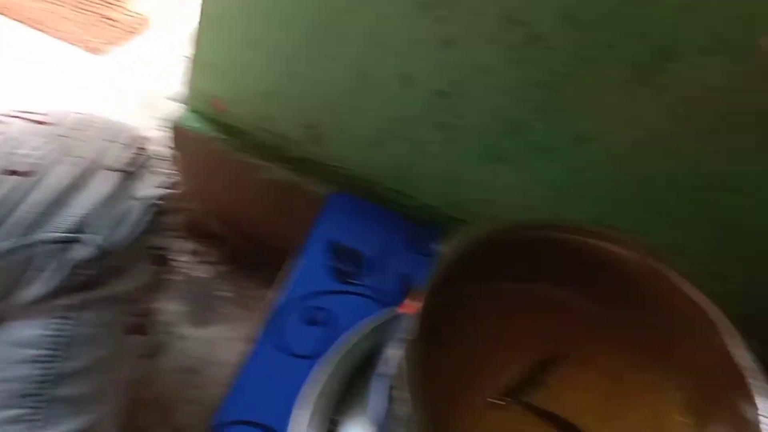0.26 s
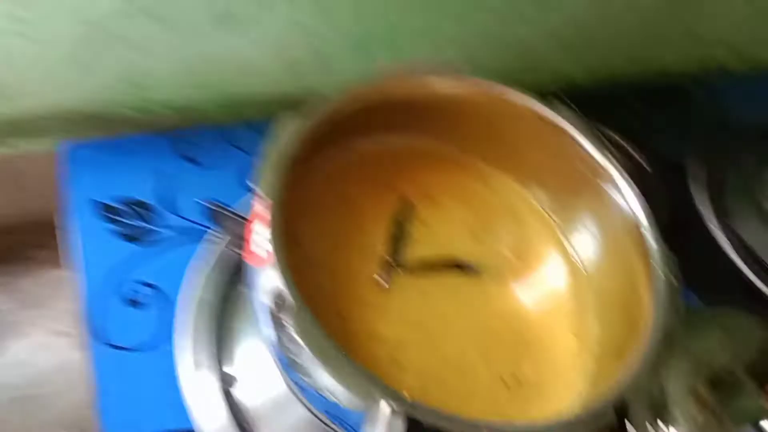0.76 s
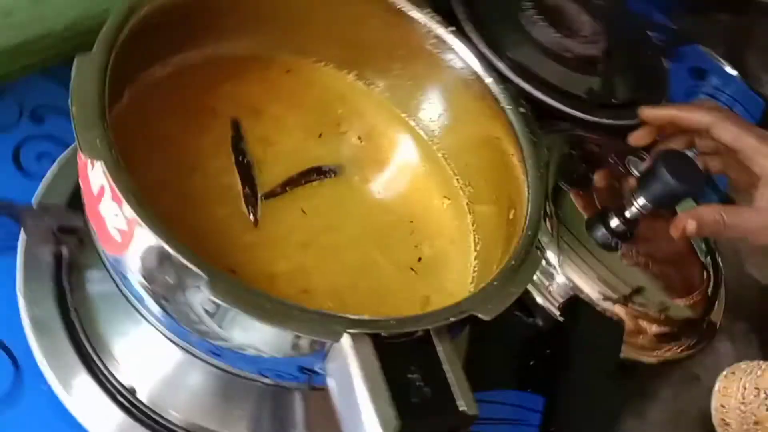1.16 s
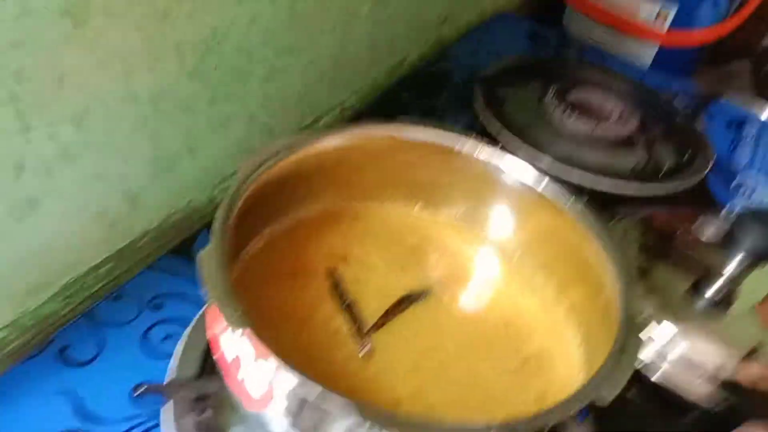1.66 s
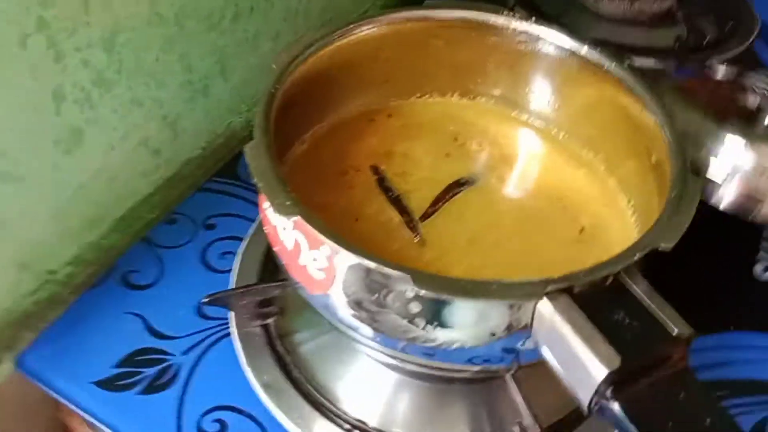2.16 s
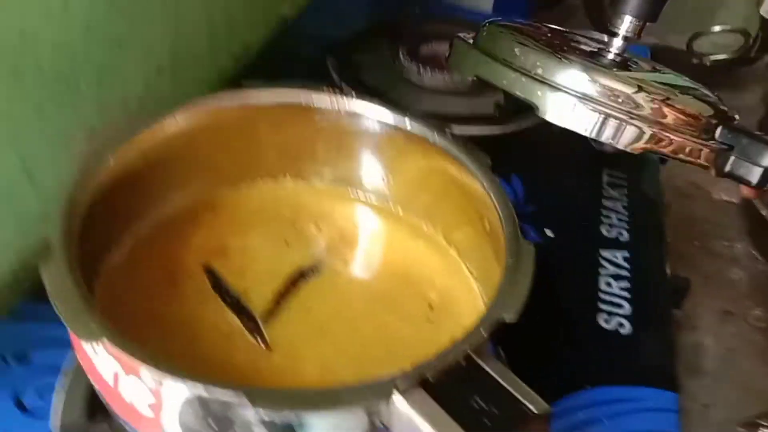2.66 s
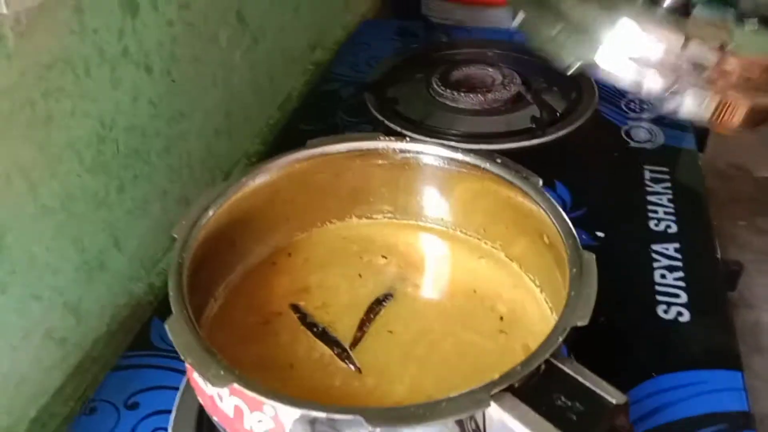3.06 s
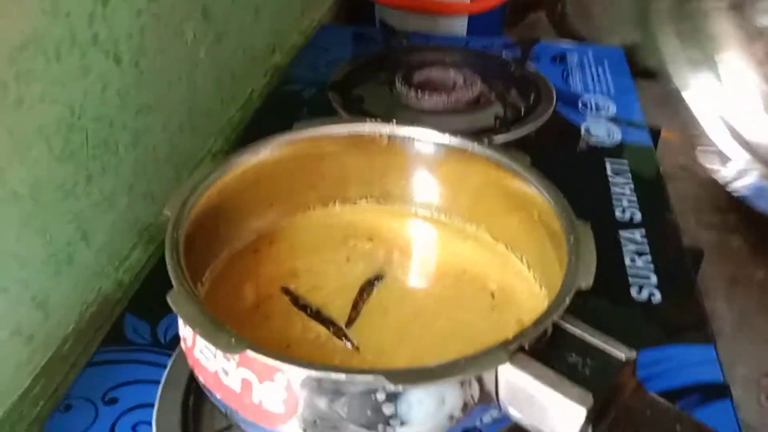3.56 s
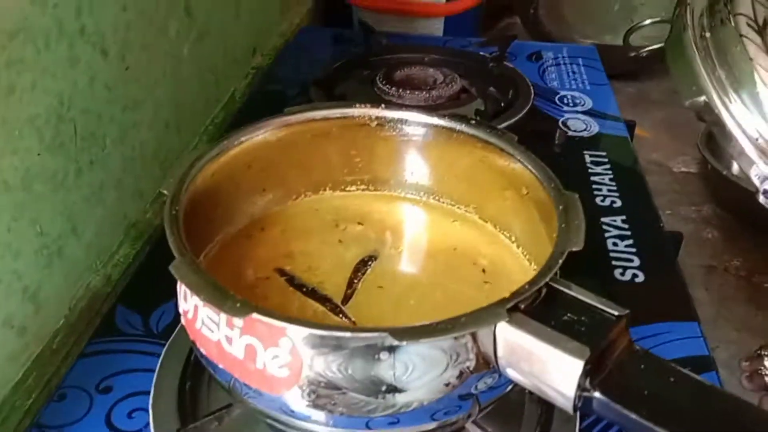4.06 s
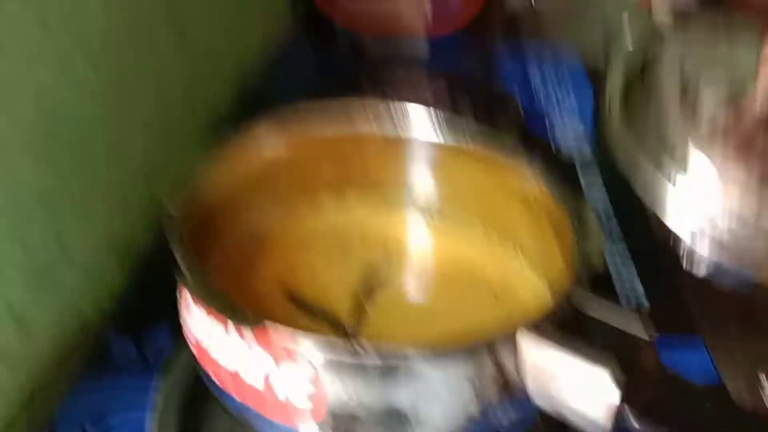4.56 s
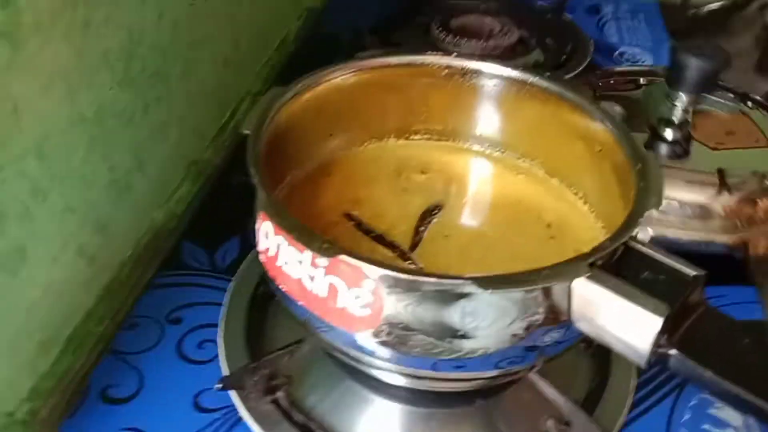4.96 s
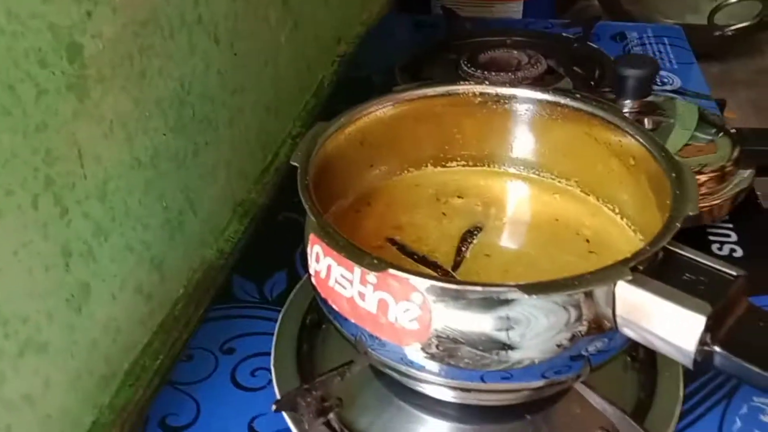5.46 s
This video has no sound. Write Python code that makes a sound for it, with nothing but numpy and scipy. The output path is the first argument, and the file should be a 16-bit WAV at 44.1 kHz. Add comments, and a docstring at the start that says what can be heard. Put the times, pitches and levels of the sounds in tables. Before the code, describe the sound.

After a brief vehicle horn outside, a metal pot lid clatters on a stove, rattles in the hand and lands with a clank.

```python
"""Moving a pressure-cooker lid

A steel lid is picked up in a small kitchen, close to a hand-held phone. It knocks on the stove top,
clinks and rattles in the air, then lands on the spare burner with a scrape and a last sharp clank.
Every hit or rub makes the steel ring at its own natural tones. A motor horn sounds once outside.
The phone overloads on the hardest blows and mutes the faintest sounds."""
import sys
import numpy as np
from scipy import signal
from scipy.fft import rfft, irfft
from scipy.io import wavfile
from scipy.ndimage import uniform_filter1d

SR = 44100
rng = np.random.default_rng(int(sys.argv[2]) if len(sys.argv) > 2 else 0)


def transcribe(signal):
    """Save signal, clipped to [-1, 1], as a 16-bit WAV file at the path in sys.argv[1]."""
    frames = np.atleast_2d(signal).T
    limited = np.clip(frames, -1, 1)
    pcm = np.round(limited * 32767).astype(np.int16)
    wavfile.write(sys.argv[1], SR, pcm)


N = 251370
T = np.arange(N) / SR
RING_T = T[:SR * 3 // 5]  # the 0.6 s that one hit is given to ring


def gain(db):
    """Turn decibels into a number to multiply by."""
    return 10 ** (np.asarray(db) / 20)


def unit(x, size=None):
    """Scale x to an average (rms) strength of 1, judged on its first size samples."""
    return x / np.sqrt(np.mean(x[:size] ** 2) + 1e-18)


def fade(t60):
    """Die away freely. Here and below, t60 is the time in seconds to fall by 60 dB."""
    return np.exp(-np.log(1000) * RING_T / t60)


def onset(rise_s):
    """Climb smoothly from silence towards full strength."""
    return 1 - np.exp(-RING_T / rise_s)


def stroke(start, rise, held, t60):
    """Loudness of one movement: it builds up, holds, then dies away."""
    build_up = np.clip((T - start) / max(rise, 1e-3), 0, 1) ** 2
    return build_up * np.exp(-np.log(1000) * np.maximum(T - start - rise - held, 0) / t60)


def band(x, low_hz, high_hz, order=3):
    """Keep only the sound between two frequencies."""
    return signal.sosfilt(signal.butter(order, [low_hz, high_hz], "band", fs=SR, output="sos"), x)


def colour(x, points):
    """Shape the bass and treble of x along (frequency [Hz], level [dB]) points; strength 1."""
    hz, db = np.transpose(points)
    bins_hz = np.maximum(np.fft.rfftfreq(len(x), 1 / SR), 1)
    curve = gain(np.interp(np.log(bins_hz), np.log(hz), db))
    return unit(irfft(rfft(x) * curve, len(x)))


def add(out, start, x):
    """Mix x into out from the start time on."""
    i = max(int(start * SR), 0)
    out[i:i + len(x)] += x[:N - i]


def ring(tones, t60, slope=0.29):
    """Each hit rings a new mix of the tones. t60 holds at 2 kHz; slope makes higher tones die sooner."""
    scatters_db = 2.5 * rng.standard_normal(len(tones))
    phases = rng.random(len(tones))
    out = np.zeros(len(RING_T))
    for (hz, db), scatter_db, phase in zip(tones, scatters_db, phases):
        wave = np.sin(2 * np.pi * (hz * RING_T + phase))
        out += gain(db + scatter_db) * wave * fade(t60 * (2000 / hz) ** slope)
    return out


def rubbed(tones, t60):
    """Fine friction keeps the tones ringing; strength 1."""
    return unit(signal.fftconvolve(rng.standard_normal(N), ring(tones, t60))[:N])


def echo(x, t60, echo_db):
    """Add a blur of echoes that builds up after the first bounce off a wall."""
    build_up = np.clip(RING_T / 0.00097 - .5, 0, 1)
    tail = rng.standard_normal(len(RING_T)) * fade(t60) * build_up
    return x + gain(echo_db) * signal.fftconvolve(x, tail / np.linalg.norm(tail))[:N]


# Table levels are relative: the function that plays a table sets how loud it ends up.
# the hiss of the kitchen air: (frequency [Hz], level [dB])
AIR_COLOUR = [(100, -11), (500, -4), (2300, -2), (5000, -9.5), (8000, -2.5), (11000, -26.5), (15000, -29.5)]
def air():
    """The still air of the kitchen hisses very faintly."""
    return gain(-75) * colour(rng.standard_normal(N), AIR_COLOUR)


# the hand shifting on the phone: (time [s], rise [s], held [s], t60 [s], level [dB])
GRIP_SHIFTS = [(0, 0.00088, 0.0031, 0.41, -38.5), (.36, 0.038, 0.59, 2.8, -59),
               (1.901, 0.034, 0.23, 0.27, -44), (2.46, .06, 0.061, 0.79, -54.5),
               (2.989, 0.043, 0.163, 0.63, -56), (3.499, 0.14, 0.039, 0.31, -37),
               (3.86, 0.046, 0.024, 1.93, -49), (4.2, .25, .03, 0.11, -56), (4.64, 0.21, 0.018, 0.26, -43),
               (5.001, 0.25, 0.049, 0.57, -32.5)]
# the low rumble: (frequency [Hz], level [dB])
RUMBLE_COLOUR = [(25, -35), (55, -17.5), (82, 9), (140, -6), (220, -18), (450, -21), (2000, -40),
                 (6000, -57.5)]
def rumble():
    """The hand rumbles on the phone, and the stove rumbles at each of the lid's knocks and clanks."""
    grips = sum(gain(db - 2.5) * stroke(*timing) for *timing, db in GRIP_SHIFTS)
    jolts = sum(gain(db - 29) * stroke(start, rise=0.011, held=0.042, t60=0.23)
                for start, db, *_ in STOVE_KNOCKS + SUPPORT_CLANKS)
    return colour(rng.standard_normal(N), RUMBLE_COLOUR) * np.hypot(grips, jolts)


def flutter(depth=0.5, fastest_hz=32):
    """A horn tone wavers as the phone swings through its echoes."""
    noise = rng.standard_normal(N) + 1j * rng.standard_normal(N)  # complex: moves level and phase
    beats = band(noise, fastest_hz / 10, fastest_hz, order=2)
    return 1 + depth * beats / np.std(beats)


# how loud the horn is at the phone: (time [s], level [dB])
HORN_LOUDNESS = [(0.346, -96), (0.362, -64.5), (0.415, -30.5), (0.47, -31), (0.512, -26), (0.548, -26),
                 (0.56, -32.5), (0.597, -20.5), (0.628, -31), (0.646, -25), (0.7, -23), (0.75, -38.5),
                 (0.772, -28), (0.806, -38), (0.844, -39.5), (0.89, -42), (0.91, -64)]
# the horn's overtones: (multiple of the pitch, level [dB])
HORN_OVERTONES = [(5, -20), (6, -25), (7, -26), (8, 5.5), (9, -3.5), (10, -15.5), (11, -34.5), (12, -30),
                  (13, -30), (16, -28), (17, -39), (19, -37.5), (21, -26), (22, -31), (23, -25.5),
                  (24, -29), (26, -32), (28, -31.5), (29, -32)]
# the horn's noisy rasp: (frequency [Hz], level [dB])
RASP_COLOUR = [(200, -20), (1300, -14), (2000, -17), (2600, -2), (3200, 0), (4000, -18), (6000, -19),
               (8000, -10), (11000, -15), (14000, -30)]
def horn(pitch_hz=336.2):
    """A buzzing diaphragm (a thin sheet) rings a disc at about eight times its own pitch."""
    waver = .003 * unit(band(rng.standard_normal(N), 8, 120))
    phase = 2 * np.pi * np.cumsum(pitch_hz * (1 + waver)) / SR

    def tone(multiple):
        return np.imag(flutter() * np.exp(1j * (multiple * phase + 2 * np.pi * rng.random())))

    buzz = unit(sum(gain(db) * tone(multiple) for multiple, db in HORN_OVERTONES))
    rasp = gain(-32) * colour(rng.standard_normal(N), RASP_COLOUR)
    times, levels_db = np.transpose(HORN_LOUDNESS)
    swell = uniform_filter1d(gain(np.interp(T, times, levels_db + 1, left=-150, right=-150)), 256)
    blare = echo((buzz + rasp) * swell, t60=0.81, echo_db=-20)
    # the phone passes through a spot where the horn's lowest tone cancels out
    dead_spot = np.clip((T - 0.628) / 0.065, -1, 1) ** 3
    hum = stroke(0.368, rise=0.055, held=0.41, t60=0.19) * dead_spot * tone(0.97)
    return blare + gain(-45.5) * hum


# dull bumps of the handle: (time [s], level [dB], pitch [Hz])
HANDLE_BUMPS = [(1.503, -61, 430), (1.705, -42.5, 270), (3.63, -48.5, 148.6), (5.179, -28, 196),
                (5.197, -28, 141), (5.289, -20.5, 325), (5.303, -23, 153), (5.466, -28, 378)]
# its soft creaks: (time [s], first pitch [Hz], last pitch [Hz], length [s], level [dB])
HANDLE_CREAKS = [(3.657, 755, 910, 0.077, -36.5), (4.007, 740, 920, 0.076, -39)]
def handle(hum_hz=140, wobble_hz=45):
    """The plastic handle hums under a tightening grip, bumps dully and creaks in its joint."""
    hum = unit(band(rng.standard_normal(N), .93 * hum_hz, 1.07 * hum_hz))
    out = gain(-56) * hum * stroke(3.3, rise=.13, held=.24, t60=.1)
    for start, db, hz in HANDLE_BUMPS:
        thud = np.sin(2 * np.pi * hz * RING_T) * fade(0.027)
        slap = band(rng.standard_normal(len(RING_T)), 300, 640, order=2) * fade(0.074)
        add(out, start, gain(db) * (unit(thud, size=512) + gain(4) * unit(slap, size=512)) / 2)
    for start, first_hz, last_hz, length, db in HANDLE_CREAKS:
        n = int(length * SR)
        wobble = unit(band(rng.standard_normal(SR), 26, 197.4))[-n:]
        hz = np.linspace(first_hz, last_hz, n) + wobble_hz * wobble
        add(out, start, gain(db) * np.hanning(n) * np.sin(2 * np.pi * np.cumsum(hz) / SR))
    return out


# hollow tones of the lid's dome: (frequency [Hz], level [dB])
DOME_TONES = [(175, -5), (425, -5)]
def dome():
    """Each of the lid's clinks sets the whole dome humming faintly."""
    out = np.zeros(N)
    for start, db, *_ in LID_CLINKS:
        add(out, start, gain(db - 24) * ring(DOME_TONES, t60=0.27, slope=0) * onset(0.012))
    return out


# pushes of the rim over the stove top and over the burner's pan support:
# (time [s], held [s], t60 [s], grind level [dB], hiss level [dB])
STOVE_SLIDES = [(1.165, .04, 0.13, -80, -63), (2.02, .09, 0.054, -43, -49), (2.113, .03, .2, -30.5, -47.5),
                (2.215, .08, 0.15, -24, -42.5)]
SUPPORT_SCRAPES = [(5.018, 0.013, 0.49, -15.5, -26), (5.1, 0.21, .04, -35.5, -40.5),
                   (5.205, .108, 0.018, -46, -30.5), (5.3, 0.014, 0.18, -20.5, -65)]
# the low grind and the high hiss of sliding steel: (frequency [Hz], level [dB])
GRIND_COLOUR = [(59, -22), (100, -9.5), (383, -7.5), (761, -4.5), (897, -5), (1130, -3), (1750, -14),
                (2210, -10.5), (2350, -8), (5000, -22.5), (6500, -54.5), (11000, -120)]
HISS_COLOUR = [(1470, -34), (2500, -9), (5450, -3.5), (6200, -2.5), (7680, 4), (9440, -16), (10200, -11),
               (15500, -10.5)]
def sliding(pushes, tones, grind_db, hiss_db, ring_db):
    """The rim catches on countless tiny bumps: they grind, hiss and keep the steel ringing."""
    noise = rng.standard_normal(N)
    grit_db = np.repeat(rng.standard_normal(N // 32 + 1), 32)[:N]  # a new level every 32 samples
    grains = noise * gain(grit_db)
    grind = colour(grains, GRIND_COLOUR) + gain(ring_db) * rubbed(tones, t60=.15)
    hiss = colour(grains, HISS_COLOUR)
    out = np.zeros(N)
    for start, held, t60, low_db, high_db in pushes:
        friction = grind * gain(low_db + grind_db) + hiss * gain(high_db + hiss_db)
        out += friction * stroke(start, 0.004, held, t60)
    return out


# the handle's steel parts rubbing the lid: (time [s], rise [s], held [s], t60 [s], level [dB])
HANDLE_RUBS = [(.75, 0.015, 0.094, .12, -52), (2.779, 0.033, .03, .15, -69.5),
               (3.866, 0.0042, 0.0055, 0.23, -30), (3.955, 0.011, .003, 0.23, -32),
               (4.028, 0.0084, 0.033, 0.035, -36), (4.697, 0.022, 0.043, 0.24, -15),
               (4.8, 0.016, 0.062, 0.035, -37)]
def rubbing():
    """The handle drags over the lid and stirs the lid's tones (listed further down)."""
    clear = rubbed(LID_TONES, t60=0.044)
    wash = gain(-13.5) * colour(rng.standard_normal(N), LID_WASH)
    return (clear + wash) * sum(gain(db - 1) * stroke(*timing) for *timing, db in HANDLE_RUBS)


# single notes of the steel: (time [s], pitch [Hz], level [dB], rise [s], t60 [s])
STEEL_NOTES = [(0.0, 1716, -52.5, 0.0014, 0.4), (3.022, 3168, -29, .001, .06),
               (3.151, 2202, -29, .002, .15), (3.870, 2200, -17.5, 0.0011, 0.24),
               (5.1, 1110, -12, 0.0081, .24), (5.455, 3000, -25, 0.00076, 0.09),
               (5.456, 4984, -21, 0.00033, 0.12)]
def singing():
    """Steel sings out with just one tone: touched lightly, or still ringing from the knock that opens the
    scene."""
    out = np.zeros(N)
    for start, hz, db, rise, t60 in STEEL_NOTES:
        add(out, start, gain(db) * np.sin(2 * np.pi * hz * RING_T) * fade(t60) * onset(rise))
    return out


# ticks of a loose steel part: (time [s], level [dB], boost of its lowest tones [dB])
FITTING_TICKS = [(0.645, -26, -28), (1.168, -46, 4), (3.294, -41, -33), (3.5655, -32, -25),
                 (3.5905, -28, 3.5), (3.6136, -12.5, -3), (3.6218, -18.5, -4), (3.6291, -6, -15.5),
                 (3.654, -7, -6), (3.6995, -14, -3.5), (3.7897, -28.5, -15), (4.4416, -43.5, -6),
                 (5.161, -24.5, 7)]
# the tones of that part: (frequency [Hz], level [dB])
FITTING_TONES = [(4230, -0.5), (4330, 1), (4840, -9), (7850, 0), (8262, 2), (8400, -1.5), (8850, -2.5),
                 (12600, 1.5), (13300, -6), (14300, 0), (14800, -2)]
def fitting(detune=0.0082):
    """A small loose part chatters on the lid; its short, high tones shift each time it settles."""
    tipping = stroke(3.612, rise=0.02, held=0.081, t60=0.016)  # it jingles as the lid is tipped
    out = gain(-31.5) * rubbed(FITTING_TONES, t60=0.027) * tipping
    for start, db, low_db in FITTING_TICKS:
        shifted = [(hz * (1 + detune * rng.standard_normal()), level) for hz, level in FITTING_TONES]
        ringing = ring(shifted, t60=0.098)
        click = band(rng.standard_normal(len(RING_T)), 4000, 16000, order=2) * fade(0.025)
        high = unit(band(ringing, 6500, 16000), size=512)
        low = unit(band(ringing, 3500, 5500), size=512)
        tick = high + gain(low_db - 12) * low + gain(-17) * unit(click, size=512)
        add(out, start, gain(db - 11) * tick * onset(0.00053))
    return out


# where heavy blows are split into bands, from bass to treble: (frequency [Hz])
HEAVY_EDGES_HZ = [150, 600, 1600, 4500, 9000, 15500]
def strike(blows, tones, wash_colour, climb_db, wash_db, level_db, tone_t60, low_t60, high_t60,
           edges_hz=HEAVY_EDGES_HZ, contact_s=0.00015):
    """Each blow rings a few clear tones over a wash: tones so crowded that they sound like noise."""
    out = np.zeros(N)
    wash_t60s = np.geomspace(low_t60, high_t60, len(edges_hz) - 1)  # the treble dies first
    centres_hz = np.sqrt(np.multiply(edges_hz[:-1], edges_hz[1:]))
    for start, strength_db, bass_db, corner_hz, slope_db, ring_factor in blows:
        # the level climbs climb_db per octave up to the corner, then falls along the treble slope
        octaves = np.log2(centres_hz / corner_hz)
        bands_db = strength_db + np.where(octaves < 0, climb_db, slope_db) * octaves
        bands_db[0] += bass_db  # the weight behind the blow feeds the lowest band
        stretch = np.clip(ring_factor, .3, 1.4)
        clear = ring(tones, tone_t60 * stretch)
        noise = colour(rng.standard_normal(len(RING_T)), wash_colour)
        for low_hz, high_hz, db, t60 in zip(edges_hz, edges_hz[1:], bands_db, wash_t60s):
            wash = noise * (fade(t60 * stretch) + 0.35 * fade(0.18))  # with the crack of the contact
            clear_part = unit(band(clear, low_hz, high_hz), size=900)
            wash_part = unit(band(wash, low_hz, high_hz), size=900)
            hit = (clear_part + gain(wash_db) * wash_part) * onset(contact_s)
            add(out, start, gain(db + level_db) * unit(hit, size=900))
    return out


# light clinks of the lid in the hand:
# (time [s], level [dB], bass boost [dB], corner [Hz], treble slope [dB/octave], ring time factor)
LID_CLINKS = [(2.502, -25, -1.5, 3537, -8.5, 1.27), (3.022, -32.5, -2, 2900, -12, 0.86),
              (3.151, -26.5, -1, 2813, -9, 1.06), (3.629, -43, 7.5, 1503, -9, 0.7),
              (3.681, -27, -9, 1760, -32, 0.92), (3.771, -34, -3, 2760, -16.5, 0.87),
              (3.871, -34, -10, 7000, -5.5, 0.41), (3.897, -28, -35, 2400, -7.5, 1.6),
              (3.973, -19, -36, 3100, -17.5, 0.66), (4.054, -40.5, -25, 2800, -17, .36),
              (4.7, -30, -7.5, 2380, -12.5, 1.36), (4.717, -17.5, -13.5, 2900, -6, 2.1),
              (4.739, -16, -1, 2100, -6, 0.43), (4.76, -15, 5, 2940, -6, 0.87),
              (4.774, -14, -16, 4100, -11.5, 1.2)]
# the lid's clear tones and its wash: (frequency [Hz], level [dB])
LID_TONES = [(916, -12.5), (1020, -18), (1272, -20), (1490, -14.5), (1757, -2), (1800, -2.5), (2145, 1),
             (2205, 8.5), (2564, 2), (2692, -14), (2965, -9), (3140, 1.5), (3168, 2), (3304, 0), (3471, 7),
             (3870, 2.5), (4140, -1.5), (4218, -11.5), (4347, -11.5), (5050, -16.5), (5660, -21),
             (6510, -16), (7819, -12.5), (7956, -16), (9127, -6.5), (9670, -19)]
LID_WASH = [(600, -34), (900, -20.5), (1100, -17.5), (1500, -5.5), (1780, -6), (2300, 2.5), (2850, -18.5),
            (3300, 0), (4200, -5), (4700, -43.5), (5700, -4), (7000, -17), (7900, -15.5), (9100, -11),
            (11500, -19), (14700, -47.5)]
# where light clinks are split into bands: (frequency [Hz])
LIGHT_EDGES_HZ = [540, 1600, 2800, 4500, 9000, 15500]
def clinks():
    """Held in the air, the lid rings clearly."""
    return strike(LID_CLINKS, LID_TONES, LID_WASH, climb_db=7.5, wash_db=-6, level_db=0.5,
                  tone_t60=0.13, low_t60=0.2, high_t60=0.1, edges_hz=LIGHT_EDGES_HZ)


# the lid knocking on the stove top:
# (time [s], level [dB], bass boost [dB], corner [Hz], treble slope [dB/octave], ring time factor)
STOVE_KNOCKS = [(0.001, -47, 5, 1500, -3.5, 0.72), (1.69, -40.5, -5.5, 4500, -12.5, 0.96),
                (1.931, -22, -12.5, 4260, -16, 0.9), (1.982, -23, -8.5, 4200, -16, 0.96),
                (2.182, -10, -16, 3100, -6, 0.89), (2.294, -33.5, -5, 3690, -7, 0.75)]
# clear tones and wash of the stove top with the lid on it: (frequency [Hz], level [dB])
STOVE_TONES = [(178, -6.5), (255, 1), (345, -6.5), (694, -9), (750, -3.5), (793, 2), (1145, -6), (1356, -8),
               (1414, -2), (1891, -10.5), (1967, -6), (2199, 7.5), (2437, -3.5), (2571, 5), (2691, -3.5),
               (3137, -6), (3516, -4.5), (5665, -9), (5873, -12), (7730, -10), (7905, -14.5)]
STOVE_WASH = [(150, -17), (240, 7), (330, 0.5), (540, -10.5), (740, 2), (990, -20), (1400, -7),
              (2400, -1.5), (3000, -10.5), (4000, -14), (4700, -23.5), (5600, -18.5), (6800, -22),
              (8000, -21), (15000, -37.5)]
def knocks():
    """The lid bumps the stove top and the two clatter together."""
    return strike(STOVE_KNOCKS, STOVE_TONES, STOVE_WASH, climb_db=0, wash_db=-2, level_db=-1.5,
                  tone_t60=0.18, low_t60=0.35, high_t60=0.17)


# the rim hitting the pan support:
# (time [s], level [dB], bass boost [dB], corner [Hz], treble slope [dB/octave], ring time factor)
SUPPORT_CLANKS = [(5.016, -20, 1, 4630, -19.5, 1.34), (5.091, -20.5, -12, 4530, -26, 0.5),
                  (5.197, -31.5, 1.5, 1100, -26, 0.23), (5.315, -17.5, -11.5, 4360, -29, 0.56),
                  (5.456, -24, 0, 5320, -16, 1.6)]
# clear tones and wash of the support with the rim on it: (frequency [Hz], level [dB])
SUPPORT_TONES = [(492, 8.5), (661, -6.5), (1111, -7.5), (1345, -1.5), (1612, -8), (1920, -3), (2203, 9.5),
                 (2573, 7.5), (2812, 2.5), (3293, -8), (3748, -5), (3875, -8), (4924, -7), (5232, -0.5),
                 (5640, -5)]
SUPPORT_WASH = [(150, -6), (470, -0.5), (580, -22), (750, -6.5), (980, -13), (1350, -12.5), (2400, 8),
                (3300, 0.5), (5200, 2.5), (7600, 0.5), (9300, -27), (12800, -19), (15500, -44)]
def clanks():
    """The rim strikes the burner's pan support, and the bass lingers."""
    return strike(SUPPORT_CLANKS, SUPPORT_TONES, SUPPORT_WASH, climb_db=1.5, wash_db=-1.5,
                  level_db=-0.5, tone_t60=0.22, low_t60=0.9, high_t60=0.17)


# the lid's landing and its bounce:
# (time [s], level [dB], bass boost [dB], corner [Hz], treble slope [dB/octave], ring time factor)
BURNER_DROPS = [(5.588, -10.5, -6, 3800, -9.5, 0.64), (5.611, -16.5, -7.5, 4650, -11, 1)]
# clear tones and wash of the burner under the whole lid: (frequency [Hz], level [dB])
BURNER_TONES = [(178, -5), (256, 1), (498, 0), (654, 1), (732, -5), (926, -7), (1170, -3), (1236, -3),
                (1349, -1), (1424, 0), (1657, -2), (1769, -1), (1909, 2), (2133, 3), (2255, 0), (2448, -2),
                (2560, 1), (4347, -3), (5356, -7), (5920, -8), (6490, -8)]
BURNER_WASH = [(150, -10), (750, -5.5), (1000, -10.5), (1400, -4), (2300, 2), (3100, -10), (4500, -7.5),
               (6600, -2), (9500, -32.5), (15000, -40)]
def drop():
    """The lid falls flat on the burner with a sharp clank and bounces once."""
    return strike(BURNER_DROPS, BURNER_TONES, BURNER_WASH, climb_db=1, wash_db=-1.5, level_db=-0.5,
                  tone_t60=0.18, low_t60=0.63, high_t60=0.28)


def scene():
    """The lid echoes in the small kitchen, over the horn, the rumble and the air."""
    slides = sliding(STOVE_SLIDES, STOVE_TONES, grind_db=-10, hiss_db=-3.5, ring_db=1.5)
    scrapes = sliding(SUPPORT_SCRAPES, SUPPORT_TONES, grind_db=-8, hiss_db=-6, ring_db=-13)
    hits = clinks() + knocks() + clanks() + drop()
    small_sounds = dome() + fitting() + rubbing() + singing() + handle()
    kitchen = echo(hits + small_sounds + slides + scrapes, t60=0.067, echo_db=-9)
    return (kitchen + horn() + rumble() + air())[None]


def record(dry, threshold_db=-96, top_hz=15600):
    """The phone mutes faint tails, clips the hardest blows and cuts the highest treble."""
    spectrum = signal.stft(dry, nperseg=512)[2]
    power = uniform_filter1d(np.abs(spectrum) ** 2, size=5, axis=-2)
    openness = power / (power + gain(threshold_db) ** 2)  # each narrow band closes as it gets faint
    gated = signal.istft(spectrum * openness)[1][:, :N]
    clipped = np.clip(gated, -1, 1)
    return signal.sosfilt(signal.ellip(10, .2, 70, top_hz, fs=SR, output="sos"), clipped)


dry = scene()
out = record(dry)
transcribe(out)
```